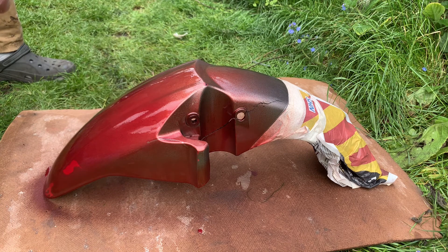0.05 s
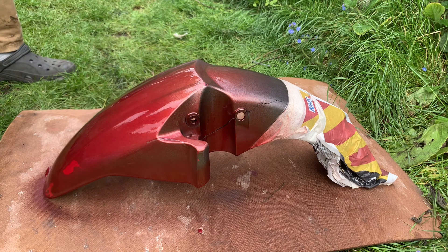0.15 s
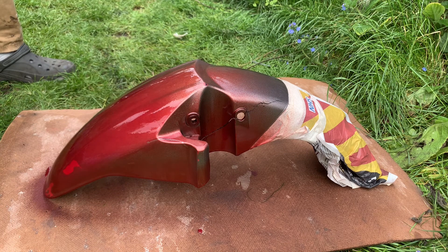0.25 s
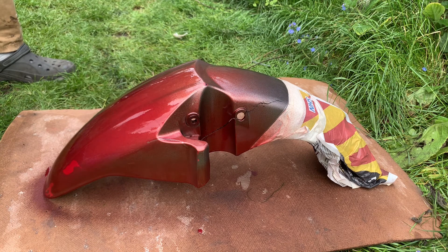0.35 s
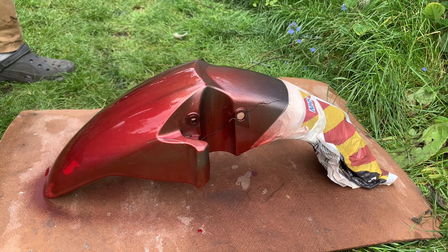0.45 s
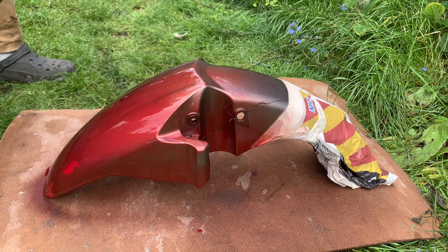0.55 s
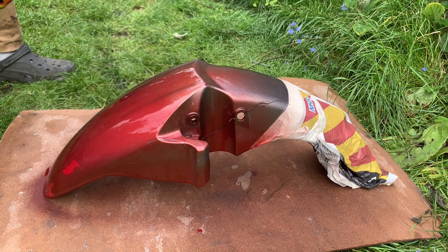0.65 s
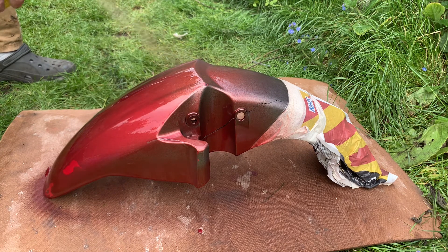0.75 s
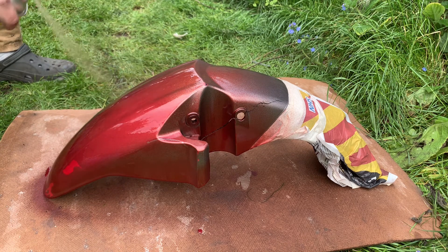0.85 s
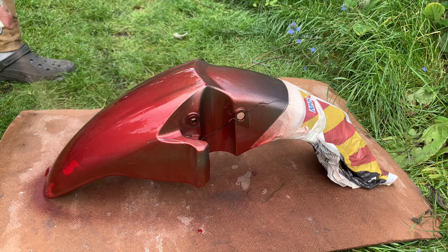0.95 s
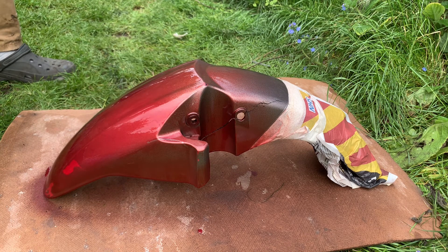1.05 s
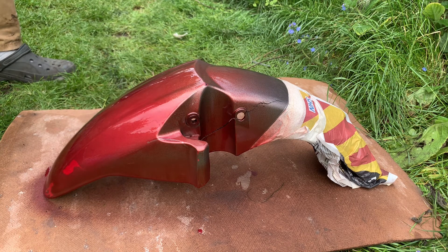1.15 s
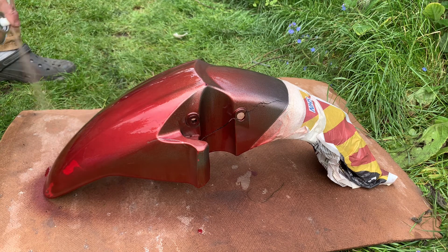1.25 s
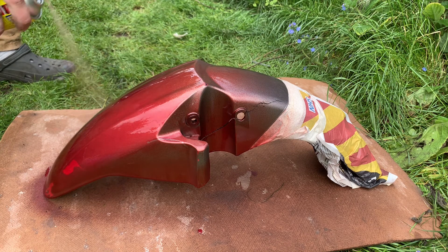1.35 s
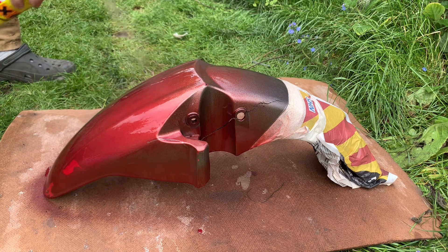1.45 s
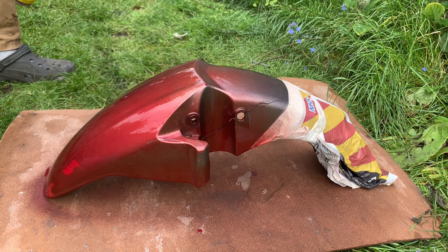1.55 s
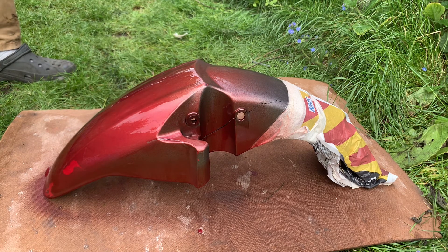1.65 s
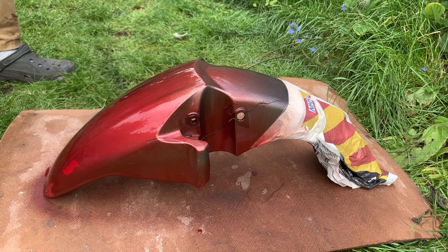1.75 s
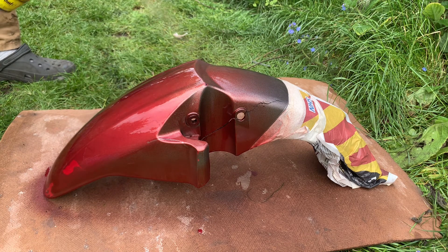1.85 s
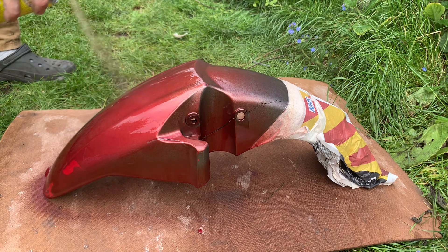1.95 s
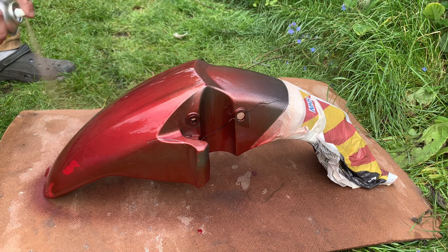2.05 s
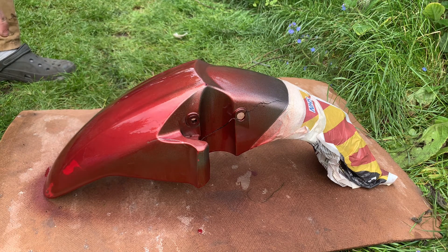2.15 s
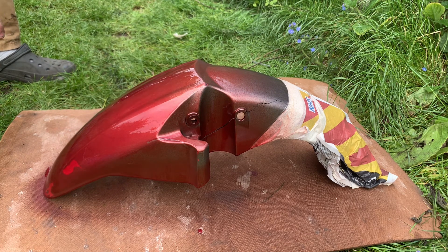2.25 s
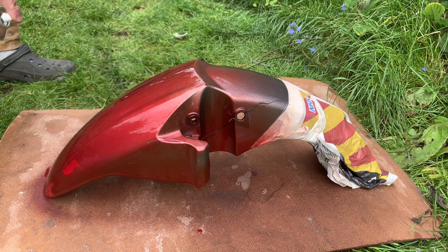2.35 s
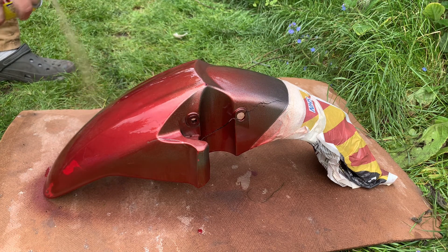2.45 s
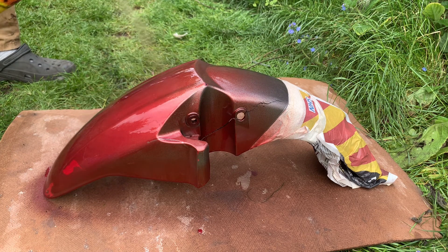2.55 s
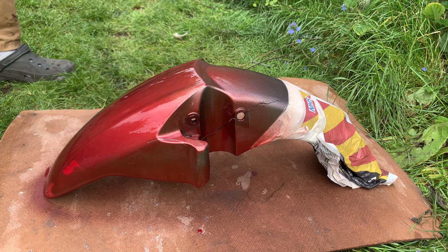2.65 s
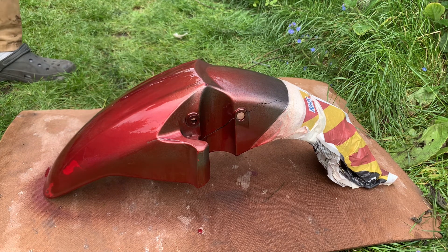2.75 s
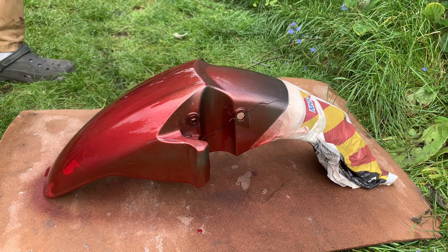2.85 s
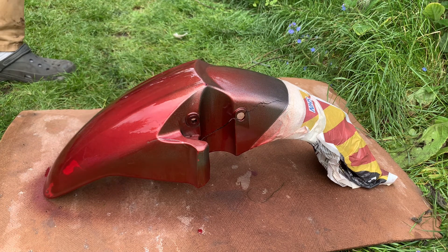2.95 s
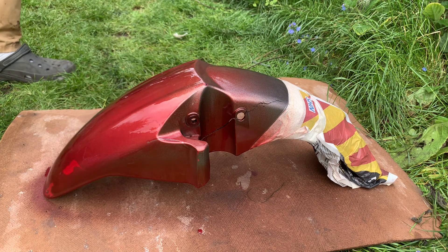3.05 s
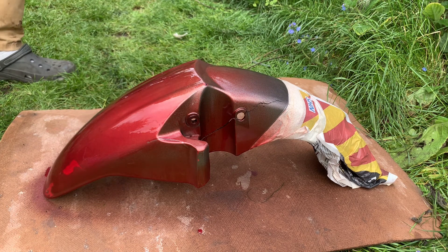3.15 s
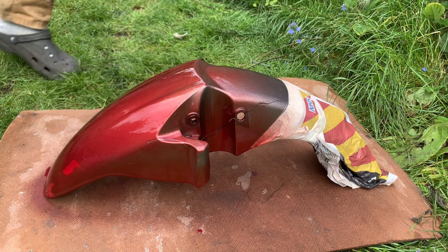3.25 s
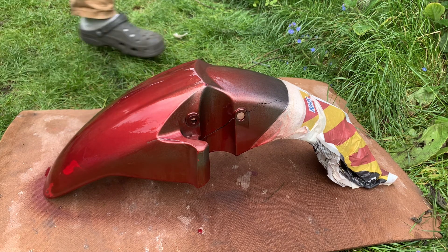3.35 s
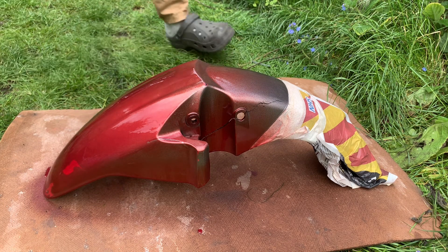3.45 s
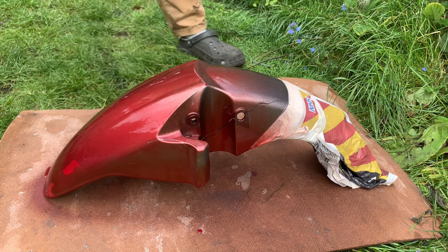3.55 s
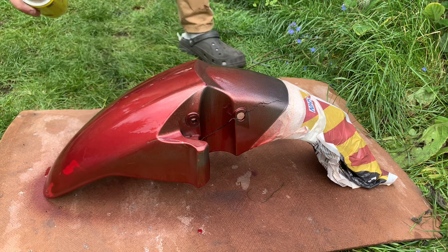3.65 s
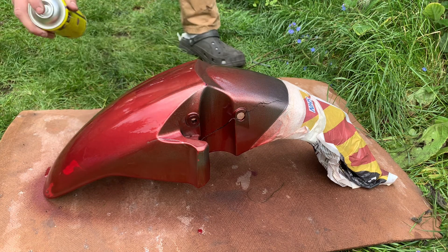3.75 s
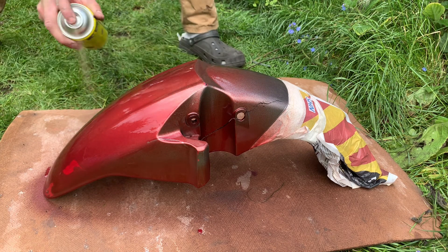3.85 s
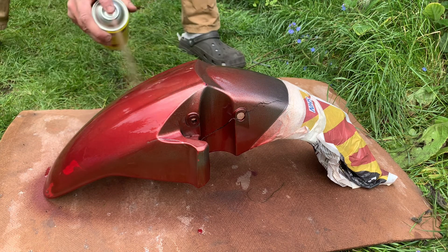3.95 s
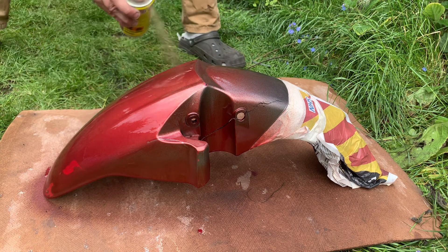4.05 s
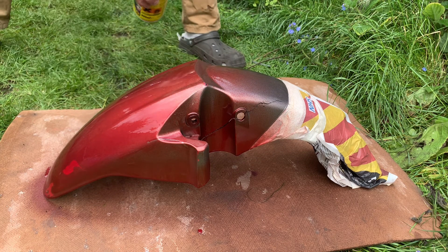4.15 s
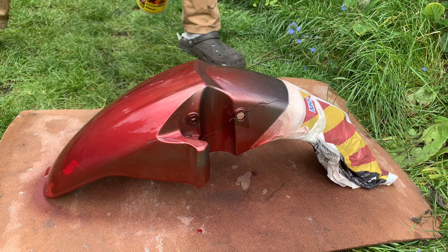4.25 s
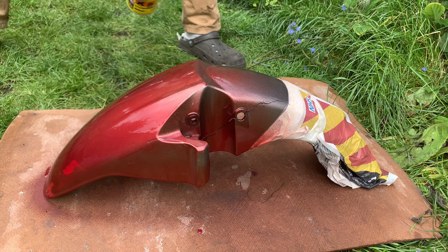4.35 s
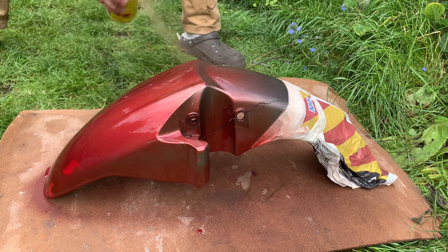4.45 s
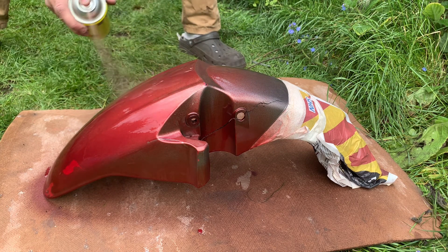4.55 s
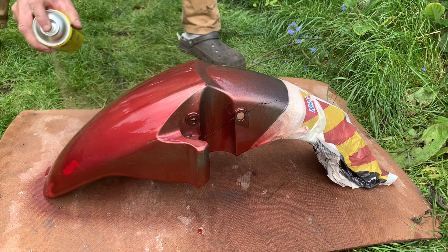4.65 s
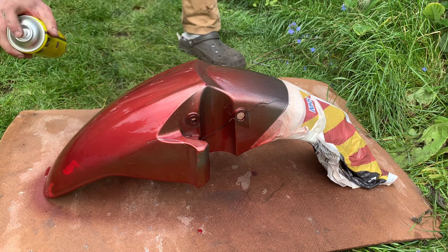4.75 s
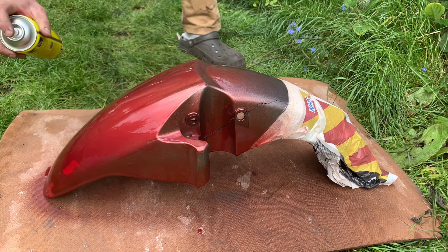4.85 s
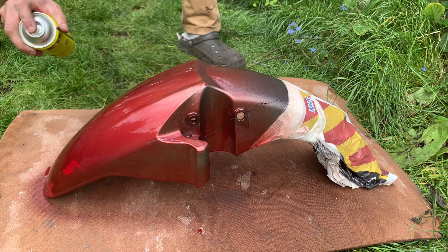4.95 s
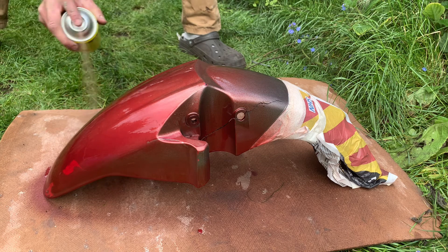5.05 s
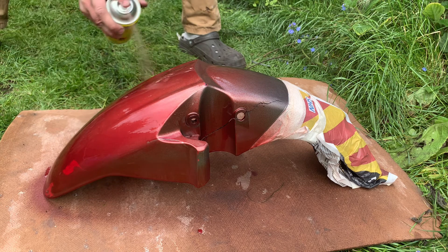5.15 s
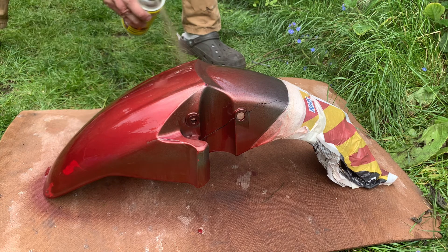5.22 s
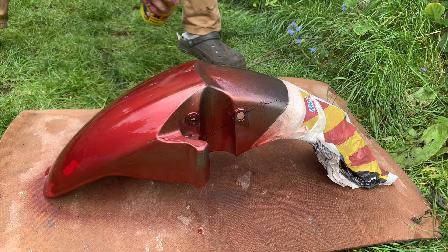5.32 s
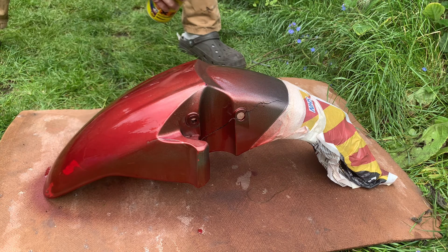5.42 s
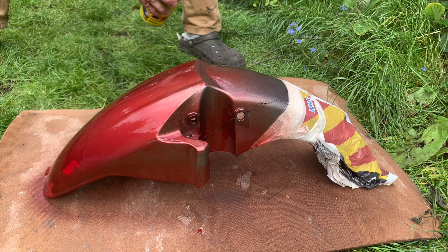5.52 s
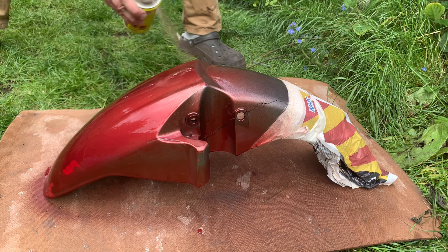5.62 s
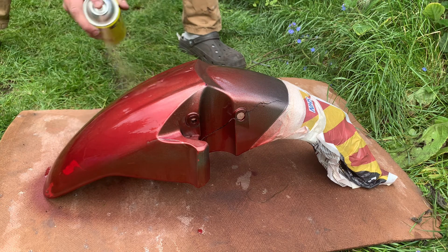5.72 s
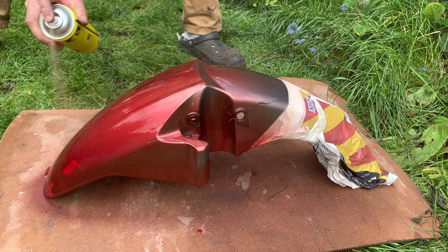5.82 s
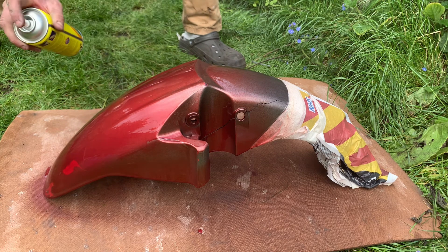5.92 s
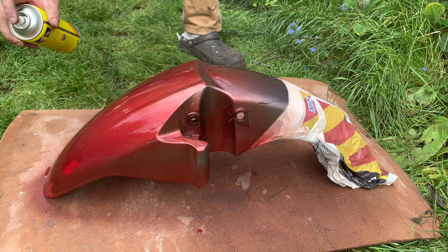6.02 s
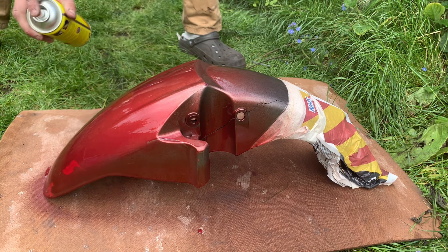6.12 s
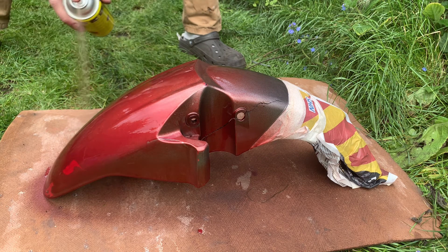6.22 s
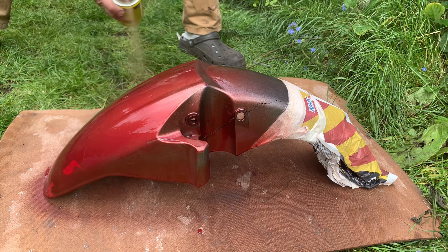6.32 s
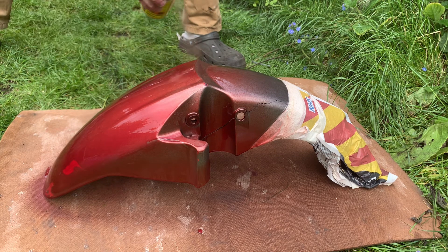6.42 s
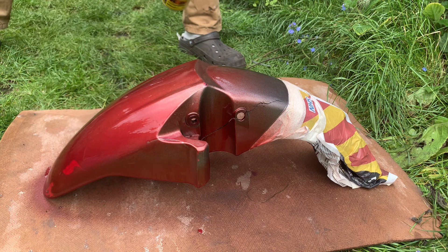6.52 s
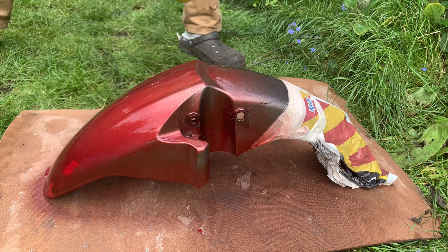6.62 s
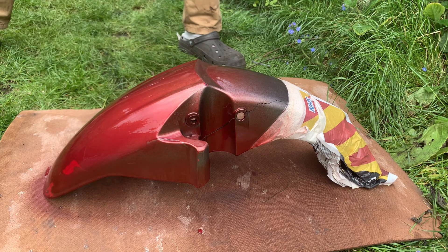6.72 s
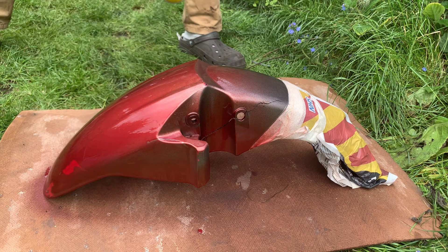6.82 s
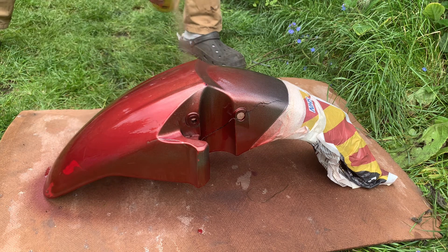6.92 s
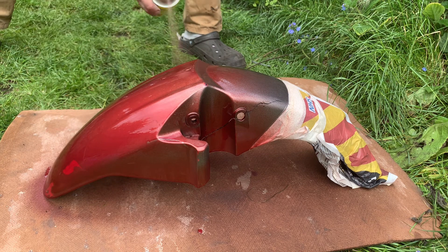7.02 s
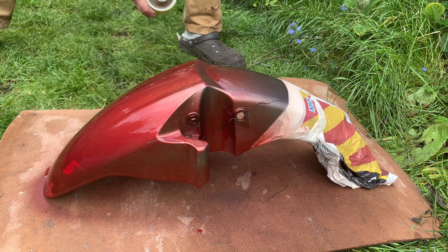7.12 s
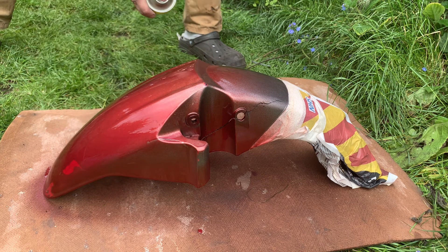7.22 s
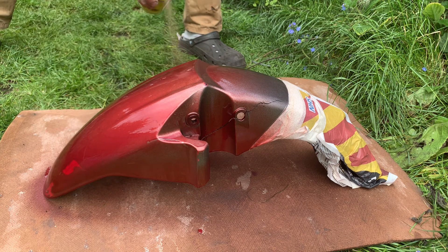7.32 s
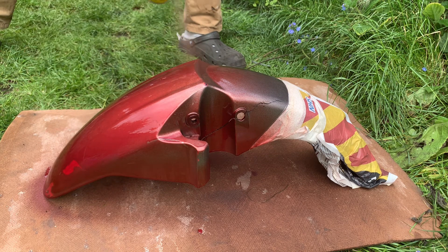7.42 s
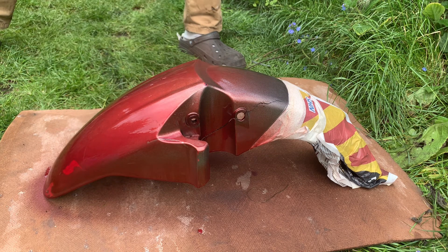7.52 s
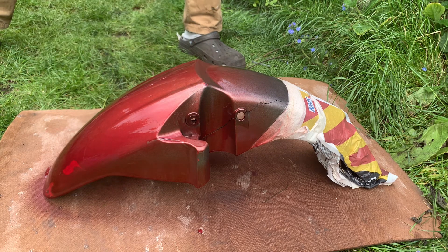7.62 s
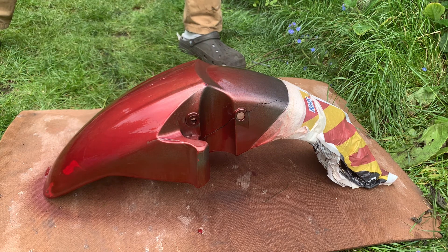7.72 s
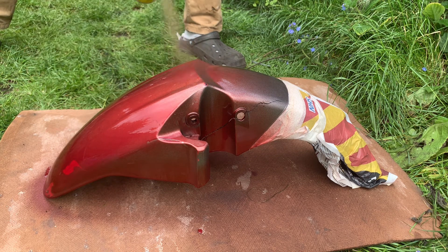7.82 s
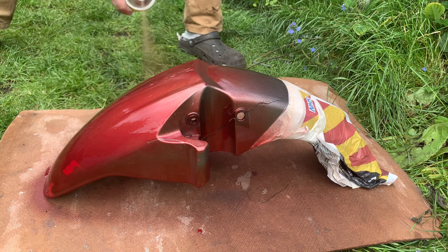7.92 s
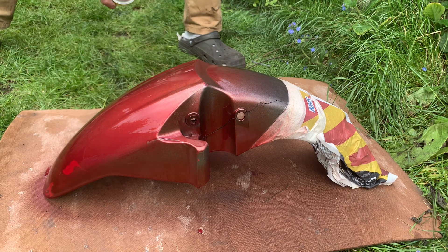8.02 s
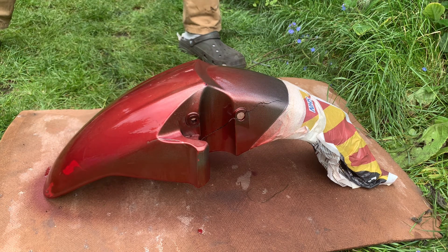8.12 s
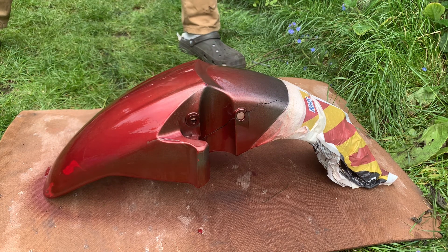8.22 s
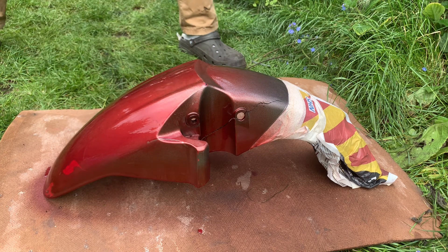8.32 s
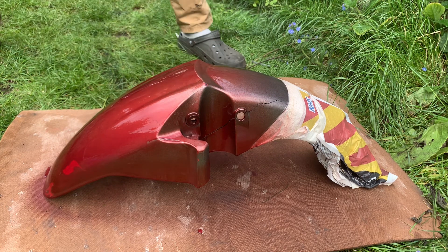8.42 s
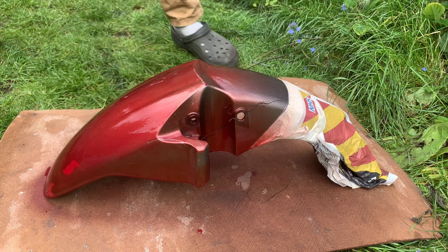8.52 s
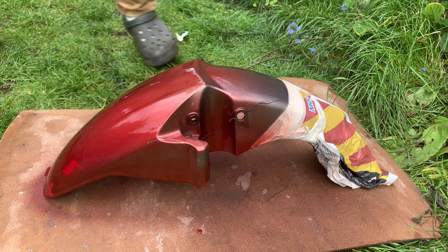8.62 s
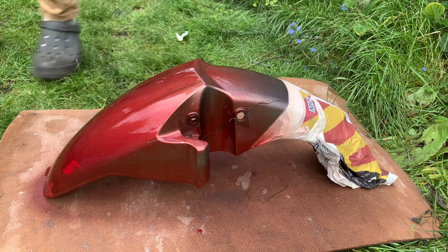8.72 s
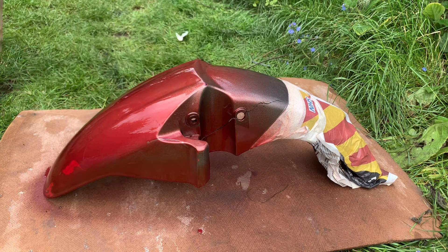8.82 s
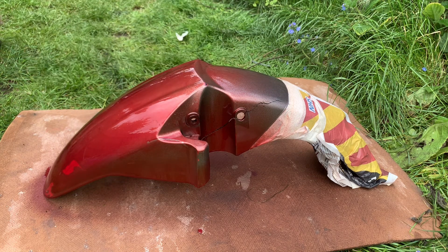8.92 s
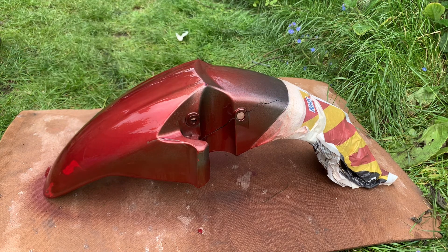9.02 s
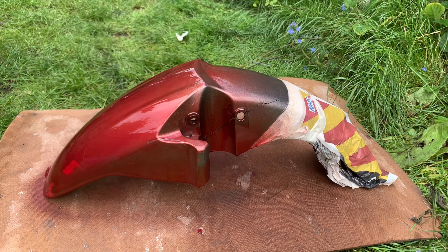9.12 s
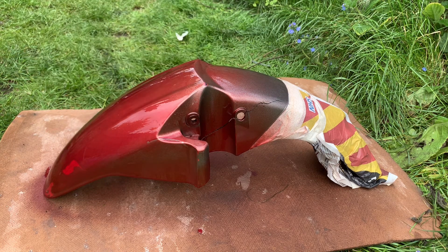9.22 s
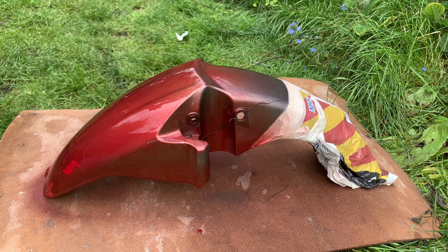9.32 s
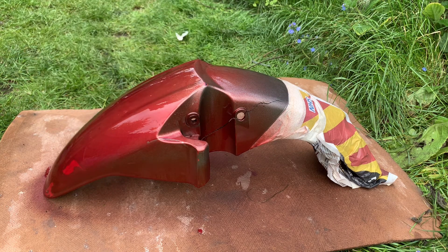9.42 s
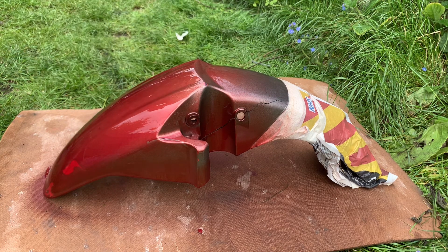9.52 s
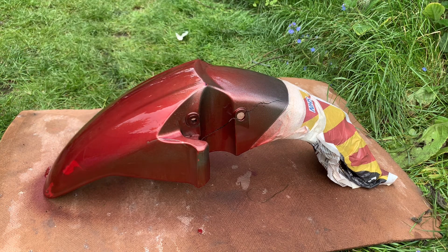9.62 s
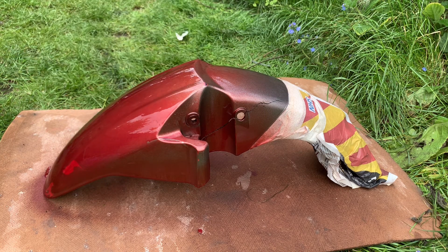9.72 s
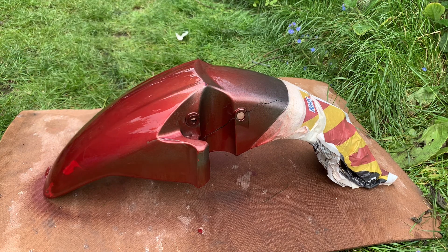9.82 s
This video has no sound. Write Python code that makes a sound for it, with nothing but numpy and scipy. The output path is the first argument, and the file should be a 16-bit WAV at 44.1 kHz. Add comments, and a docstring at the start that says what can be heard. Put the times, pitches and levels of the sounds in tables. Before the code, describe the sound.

A quiet garden with soft, far traffic rumble, slightly louder throughout, and barely audible bird notes in the first half second. Close to the microphone, an aerosol can gives bright, hissing squirts at about 0.6, 1.2, 1.8 and 2.4 s, each roughly 0.3 s, with a tiny leak before the sudden full flow and a quick shut-off. Very faint cap ticks fall near 1.0 and 1.2. From 2.9 to 3.7 the painter moves: grass swishes, a small hollow double knock at 3.2, a stronger brush at 3.7, while a distant engine drones low. Squirts resume at 3.8, 4.4, 5.0, 5.5 and 6.1, slightly softer, their airy colour sweeping; a thin, high whistle barely lingers after the first two. Shorter squirts follow at 6.8, 7.2 and 7.8. Deep dull thumps come around 7.5 and 8.0, then faint grassy steps and swelling traffic until 9.9.

```python
"""In a garden, an aerosol can sprays a fender: twelve short squirts swept to and fro across the part.
Each squirt is shaped noise, gated by a valve, combed by gliding reflections and shifted in stereo phase.
The painter's steps, noise swishes with clicks and damped knocks, follow the fourth squirt and the last.
Distant traffic (filtered noise) slowly swells, with one droning engine (sines) and a few dull thumps.
Faint gliding bird notes, cap ticks and a narrow-band whistle complete the scene."""
import sys
import numpy as np
from scipy import signal
from scipy.fft import rfft, irfft, next_fast_len
from scipy.io import wavfile
from scipy.ndimage import uniform_filter1d, map_coordinates

SR = 44100
rng = np.random.default_rng(int(sys.argv[2]) if len(sys.argv) > 2 else 0)


def master_out(mix):
    """Clip the mix to full scale and print it as 16-bit PCM to the path in sys.argv[1]."""
    frames = np.transpose(np.atleast_2d(mix))
    ceiling = np.clip(frames, -1, 1)
    pcm = np.round(ceiling * 32767).astype(np.int16)
    wavfile.write(sys.argv[1], SR, pcm)


N = 435266

# Distant traffic drawing nearer: t/s, relative level of its roar/dB
TRAFFIC_LEVEL = [(0, -61), (3.2, -54.5), (5.5, -52.5), (9.87, -48)]
# Spectra of traffic rumble, tyre roar and faint hiss: f/Hz, relative level/dB (per Hz)
RUMBLE_SPECTRUM = [(25, -29), (35, -8.5), (45, 2.5), (70, 1.5), (110, -6), (170, -7.5), (240, -8.5),
                   (330, -18), (600, -24), (1500, -61.5)]
ROAR_SPECTRUM = [(150, -25.5), (380, -3), (600, -2.5), (950, -1.5), (1400, -6.5), (2000, -14.5),
                 (3000, -24), (6000, -56.5)]
AIR_SPECTRUM = [(800, -9), (2200, -3), (4500, -0.5), (7000, -5.5), (10000, -14), (13000, -19.5),
                (15500, -23.5)]
# Left-right likeness of the surroundings: f/Hz, correlation [-1 to 1]
AMBIENT_LIKENESS = [(60, 0.95), (130, 0.97), (290, 0.82), (640, 0.21), (1400, 0.19), (2500, -.1),
                    (5500, -0.23), (7500, 0.93)]
RUMBLE_DB, RUMBLE_GROWTH = -48.5, 0.97  # level at the mean roar/dB; dB per dB of roar
AIR_START_DB, AIR_RISE_DB_PER_S = -78, 1.34

# A far engine pulls, then eases off:
# t/s, firing rate f/Hz, relative level of the firing tone/dB, level of its octave/dB
ENGINE_COURSE = [(0, 41.6, -67.5, -57), (1.3, 41.47, -57, -57.5), (2.4, 49, -49.5, -76),
                 (3, 49.45, -41.5, -59), (3.8, 46.3, -42, -66), (4.2, 44.12, -51, -64),
                 (6, 35.35, -71, -61), (7.5, 34.96, -44.5, -44.5), (8.9, 36.43, -51.5, -45),
                 (9.87, 34.82, -67, -54)]
# Higher engine overtones: multiple of the firing rate [1], level at the mean traffic roar/dB
ENGINE_OVERTONES = [(3, -62.5), (4, -60.5)]

# Very faint far bird notes: t/s, length/s, start f/Hz, end f/Hz, relative level/dB
BIRD_NOTES = [(.01, .08, 6770, 6100, -75), (.11, .08, 4620, 4560, -75), (.19, .06, 4050, 3950, -75),
              (.03, .47, 2900, 2830, -67), (.42, .2, 4250, 4500, -77)]
# Decay of the garden's scattered tail: f/Hz, t60/s
GARDEN_DECAY = [(500, .25), (4000, 0.23), (14000, 0.11)]

# Squirts: valve cracks t/s, valve shuts t/s, level/dB, start place and end place along the fender
# [0 left to 1 right], low hiss/dB, jet faces the microphone t/s, top treble gain then/dB,
# first leak to full flow/s
SQUIRTS = [(0.644, 0.968, -24.5, 0.49, 0.16, 0.5, .8, 2, .034),
           (1.211, 1.517, -24.5, 0.36, 0.6, 1, 1.35, 1, 0.03),
           (1.787, 2.1, -24.5, 0.67, 0.21, -0.5, 1.9, 2.5, .029),
           (2.361, 2.633, -25, 0.19, 0.74, 0, 2.47, 0, 0.03),
           (3.81, 4.113, -25, 0.1, 0.36, -1.5, 3.92, 3, 0.041),
           (4.363, 4.674, -26, 0.43, 0.016, -0.5, 4.56, 2, 0.031),
           (4.955, 5.29, -26.5, 0.034, 0.66, 2, 5.03, 3.5, 0.029),
           (5.53, 5.871, -27.5, 0.73, 0.012, 2, 5.68, 4.5, 0.032),
           (6.117, 6.464, -26.5, 0.03, 0.423, 0, 6.22, 5.5, 0.028),
           (6.83, 7.059, -26.5, 0.54, 0.65, 2.5, 6.93, 2.5, 0.031),
           (7.246, 7.5, -26.5, 0.59, 0.56, 2, 7.35, 3, 0.025),
           (7.758, 7.96, -26.5, 0.52, 0.51, 3, 7.85, 2.5, .027)]
# Jet spectra from the painter's two stances: f/Hz, relative level/dB (per Hz)
JET_SIDE_SPECTRUM = [(300, -38), (1500, -29), (2200, -30.5), (3000, -14), (4000, -18), (5400, -16),
                     (6300, -14.5), (7600, -9.5), (8600, -12), (10000, -4.5), (11500, -2), (12600, -1.5),
                     (13700, -7.5), (15600, -8.5)]
JET_BEHIND_SPECTRUM = [(300, -44), (1500, -21.5), (2000, -18), (2600, -17), (3300, -20), (4200, -17.5),
                       (5200, -13.5), (6000, -17), (6700, -10), (8000, -5), (9000, -9.5), (10000, -5),
                       (11000, -1), (13700, -1), (15600, -8.5)]
# Left-right likeness of the jet: f/Hz, correlation [-1 to 1]
JET_LIKENESS = [(1000, .85), (2200, .95), (2700, .93), (3300, .97), (4300, .82), (5600, .65), (6600, .88),
                (8000, .995)]
# Left-right phase of the stereo image below 7.5 kHz:
# f/Hz, early squirts/rad, later squirts with place low/rad, later squirts with place high/rad
STEREO_PHASE = [(0, 0, 0, 0), (1200, 1.9, 1.6, 1.4), (1900, 3, 2.9, 2.2), (2400, 3.14, 3.1, 2.85),
                (2900, 3.45, 3.3, 3.08), (3300, 4.6, 3.9, 3.14), (3750, 6.1, 5.4, 3.25),
                (4400, 6.28, 6.25, 4.1), (5300, 6.3, 6.3, 5.1), (6200, 3.5, 5.4, 3.5),
                (6800, 3.2, 4.1, 3.18), (7250, 3.14, 3.1, 3.1)]
# Left-right phase in the top treble, common to all three curves: f/Hz, phase/rad
STEREO_PHASE_TOP = [(7800, 2.35), (9150, .05), (9500, 0), (11650, -3.14), (13800, -6.25), (14250, -6.3),
                    (16000, -9.1)]
HIGH_PLACE = .55  # from this place on the high-place phase curve holds in full
CROSSING_S = 3  # the painter steps from the side to behind the fender
# from behind, the fender's hump hides the low hiss past SHADE_PLACE
SHADE_DB, SHADE_HZ, SHADE_PLACE, SHADE_WIDTH = 4.5, 5900, 0.25, 0.21
# from behind, a broad ridge: pitch at the left end, rise to the right end, half width, height
RIDGE_HZ, RIDGE_SPAN_HZ, RIDGE_WIDTH_HZ, RIDGE_DB = 7600, 1100, 650, 3.8
# the treble above BEAM_HZ is beamed forward and passes the microphone in about twice BEAM_S
BEAM_HZ, BEAM_S = 12700, 0.04
# reflections off the fender's curves and the board: shortest and longest detour at the left end,
# their growth to the right end, joint strength
ECHO_FIRST_MS, ECHO_LAST_MS, ECHO_STRETCH, ECHO_STRENGTH = .55, 3.6, .85, .64
ECHO_BEHIND = .6  # share of that strength from behind, where the jet points away from the board

# Small ticks of the finger on the nozzle cap: t/s, initial level/dB
CAP_TICKS = [(1.03, -60), (1.186, -63)]
# Dull thumps: t/s, peak level/dB before the stereo balance, f/Hz
THUMPS = [(2.212, -36, 84.5), (2.282, -35.5, 52.1), (3.244, -41, 63.4), (4.51, -36.5, 63.6),
          (7.438, -26.5, 57), (7.525, -30, 59.2), (7.966, -26, 61.5), (8.015, -22.5, 48.7),
          (8.128, -28, 54)]
THUMP_SWELL_S = 0.02

# Soft rustle while the painter moves: start t/s, end t/s, level/dB
SHUFFLES = [(2.87, 3.66, -69.5), (8.2, 9.9, -73.5)]
# Shoes brushing through grass: middle t/s, half length/s, level/dB, tilt/(dB per octave)
STEPS = [(2.949, 0.059, -61.5, 2.5), (3.125, 0.078, -54, -0.5), (3.279, 0.04, -58.5, 4),
         (3.521, 0.029, -62.5, 7), (3.727, 0.054, -44, 0), (8.258, 0.035, -63, 2), (8.567, 0.089, -62, 5),
         (8.725, .025, -66, 6), (8.819, 0.097, -59, 0.5), (9.121, 0.022, -58.5, 3.5),
         (9.728, 0.054, -62, 2)]
# Spectrum of the grass before the tilt: f/Hz, relative level/dB (per Hz)
GRASS_SPECTRUM = [(400, -4), (1100, 2), (2000, 2), (3000, 5.5), (4400, 3), (6000, -1.5), (9000, -4),
                  (13000, -7.5), (15500, -14)]
SHUFFLE_TILT = 2.8  # dB per octave
STRIDE_ROUNDNESS = 2.2  # exponent: how squarely a stride swells and stops
SNAPS_PER_S, SNAP_SPREAD_DB, SNAP_SHARE = 450, 4.5, .6  # blades snapping within the swish
GRASS_FLUTTER_DB = 1.1

# Knocks of a landing shoe: t/s, relative level/dB
KNOCKS = [(3.168, -25), (3.252, -30)]
# Ringing modes of the shoe: f/Hz, relative level/dB, t60/s
SHOE_MODES = [(141.4, -7, 0.045), (250, -6, 0.035), (405, -9, 0.025), (600, -5, 0.02), (1030, .5, 0.024),
              (1300, -4, 0.022), (2070, -14, .02)]
# A thin whistle lingering after two squirts: middle t/s, half length/s, level/dB
WHISTLES = [(4.24, 0.16, -74.5), (4.75, 0.042, -69)]
WHISTLE_HZ, WHISTLE_WIDTH_HZ = 10980, 130
TOP_HZ = 15850  # middle of the final cutoff


def amp(db):
    """Logarithmic level: decibels become an amplitude ratio."""
    return 10 ** (np.asarray(db) / 20)


def unit(x):
    """Power normalisation: scale to rms 1."""
    return x / np.sqrt(np.mean(x ** 2) + 1e-20)


def clock():
    """Uniform sampling: the time of each sample in seconds."""
    return np.arange(N) / SR


def along(points, hz):
    """Logarithmic pitch: interpolate (f, value) points on a log frequency axis."""
    f, v = np.transpose(points)
    return np.interp(np.log(hz + 1), np.log(f + 1), v)


def curves(rows):
    """Linear interpolation in time: one curve for each column after t."""
    s, *columns = np.transpose(rows)
    return [np.interp(clock(), s, column) for column in columns]


def wobble(rate, size=N):
    """Band-limited fluctuation: a smooth random curve with rate knots a second."""
    knots = rng.standard_normal(int(size * rate / SR) + 4)
    coarse = np.arange(0, size + 16, 16)
    smooth = map_coordinates(knots, [coarse * rate / SR])
    return np.interp(np.arange(size), coarse, smooth)


def filtered(x, response):
    """Linear filtering: multiply the spectrum by a response of frequency."""
    size = x.shape[-1]
    padded = next_fast_len(size + 4096)
    hz = np.fft.rfftfreq(padded, 1 / SR)
    return irfft(rfft(x, padded) * response(hz), padded)[..., :size]


def rush(spectrum, alike, size=N):
    """Partial coherence: mid and side noises give coloured stereo of the set likeness, rms 1."""
    def colour(hz):
        turn = np.arccos(np.clip(along(alike, hz), -1, 1)) / 2
        return amp(along(spectrum, hz)) * [np.cos(turn), np.sin(turn)]
    mid, side = filtered(rng.standard_normal((2, size)), colour)
    return unit(np.array([mid + side, mid - side]))


def add(track, s, sound):
    """Superposition: mix a sound into the track at time s."""
    part = track[..., round(s * SR):][..., :sound.shape[-1]]
    part += sound[..., :part.shape[-1]]


def patchy(x, depth_db, order=7, count=22):
    """Spectral fluctuation: smoothed random gains over frequency and time make the colour drift."""
    z = signal.stft(x, nperseg=512, noverlap=384)[2]
    field = rng.standard_normal(z.shape[1:])
    field = uniform_filter1d(field, order, 0)  # across frequency
    field = uniform_filter1d(field, count, 1)  # across time
    z = z * amp(depth_db * unit(field))
    return unit(signal.istft(z, nperseg=512, noverlap=384)[1][:, :x.shape[-1]])


def stereo_phases(hz):
    """Stereo phase: three left-right phase curves over frequency, sharing one top treble."""
    f, *columns = np.transpose(STEREO_PHASE)
    top_f, top = np.transpose(STEREO_PHASE_TOP)
    return [np.interp(hz, np.r_[f, top_f], np.r_[column, top]) for column in columns]


def widened(x):
    """Stereo phase: one fixed left-right phase curve widens all the surrounding sounds."""
    return filtered(x, lambda hz: np.exp(.5j * stereo_phases(hz)[0] * np.array([[1], [-1]])))


def garden(x):
    """Diffuse scattering: plants and fences add a short exponential tail, faster in the treble."""
    hz, t, z = signal.stft(rng.standard_normal(SR // 3), SR, nperseg=256)
    decay = amp(-60 * t / along(GARDEN_DECAY, hz)[:, None])
    tail = signal.istft(z * decay, SR, nperseg=256)[1]
    return signal.fftconvolve(x, tail[None] / np.linalg.norm(tail), axes=1)[:, :N]


def traffic(roar_db=-1):
    """Broadband noise: rumble, tyre roar and faint hiss swell together, each wavering on its own."""
    level, = curves(TRAFFIC_LEVEL)
    rumble_db = RUMBLE_DB + RUMBLE_GROWTH * (level - level.mean()) + 1.88 * wobble(9)
    rumble = amp(rumble_db) * rush(RUMBLE_SPECTRUM, AMBIENT_LIKENESS)
    roar = patchy(rush(ROAR_SPECTRUM, AMBIENT_LIKENESS), depth_db=2.15, order=2, count=24)
    roar = amp(roar_db + level + 0.33 * wobble(16)) * roar
    air_db = AIR_START_DB + AIR_RISE_DB_PER_S * clock() + 2.1 * wobble(5.7)
    air = amp(air_db) * rush(AIR_SPECTRUM, AMBIENT_LIKENESS)
    return rumble * amp([[-1], [1]]) + roar + air  # the rumble leans right


def engine(level_db=2, waver_db=1, overtone_growth=1.6):
    """Harmonic series: only the firing tone and its first overtones carry this far."""
    hz, tone_db, octave_db = curves(ENGINE_COURSE)
    near, = curves(TRAFFIC_LEVEL)
    phase = 2 * np.pi * np.cumsum(hz) / SR
    tone = amp(tone_db + level_db + waver_db * wobble(12)) * np.sin(phase)
    octave = amp(octave_db) * np.sin(2 * phase)
    overtones = sum(amp(db) * np.sin(round(k) * phase) for k, db in ENGINE_OVERTONES)
    return tone + octave + amp(overtone_growth * (near - near.mean())) * overtones


def bird(level_db=-1, blur=1.0):
    """Frequency glides: short notes, blurred in phase by distance and leaves."""
    out = np.zeros(N)
    for s, length, start_hz, end_hz, db in BIRD_NOTES:
        size = round(length * SR)
        phase = 2 * np.pi * np.cumsum(np.linspace(start_hz, end_hz, size)) / SR
        phase = phase + blur * wobble(start_hz / 12, size=size)
        add(out, s, amp(db + level_db) * np.hanning(size) * np.sin(phase))
    return garden(out[None])


def delayed(x, ms):
    """Propagation delay: one channel, later by a time that may change."""
    return map_coordinates(x, [np.arange(len(x)) - ms * SR / 1000], order=3)


def reflected(jet, place, strength, count=12):
    """Comb filtering: small reflections ripple the hiss and glide as the hand sweeps and trembles."""
    stretch = 1 + ECHO_STRETCH * (place + .012 * wobble(14, size=len(place)))
    spacing = (np.arange(count) + rng.random(count)) / count
    detours_ms = ECHO_FIRST_MS * (ECHO_LAST_MS / ECHO_FIRST_MS) ** spacing
    gains = rng.choice([-1, 1], count) / np.sqrt(detours_ms)
    gains = gains * strength * ECHO_STRENGTH / np.linalg.norm(gains)
    sides = []
    for side in jet:
        echoes = sum(gain * delayed(side, ms * stretch) for ms, gain in zip(detours_ms, gains))
        sides.append(side + echoes)
    return unit(np.array(sides))


def swept(jet, place, facing_s, low_db, beam_db, behind):
    """Moving colour: lows dim, a ridge glides, treble flares, the stereo phase shifts."""
    hz, t, z = signal.stft(jet, SR, nperseg=512, noverlap=384)
    hz = hz[:, None]
    place = np.interp(t, np.arange(len(place)) / SR, place)
    shade_db = -behind * SHADE_DB / 2 * np.tanh((place - SHADE_PLACE) / SHADE_WIDTH)
    low = (low_db + shade_db) / (1 + (hz / SHADE_HZ) ** 8)
    ridge_hz = RIDGE_HZ + RIDGE_SPAN_HZ * place
    ridge = behind * RIDGE_DB * np.exp(-((hz - ridge_hz) / RIDGE_WIDTH_HZ) ** 2)
    treble = 1 - 1 / (1 + (hz / BEAM_HZ) ** 20)
    beam = beam_db * np.exp(-((t - facing_s) / BEAM_S) ** 2) * treble
    phase, low_place, high_place = stereo_phases(hz)
    if behind:
        phase = low_place + (high_place - low_place) * np.clip(place / HIGH_PLACE, 0, 1) ** 2
    z = z * amp(low + ridge + beam) * np.exp(.5j * np.array([phase, -phase]))
    return signal.istft(z, SR, nperseg=512, noverlap=384)[1][:, :jet.shape[-1]]


def spray(leak_db=-12.5, leak_s=0.0099, open_s=0.023, shut_s=0.034, sputter_db=-0.05, flow_db=1.3):
    """Jet turbulence: gas leaks as the valve cracks, then the full jet hisses as the hand sweeps."""
    out, size = np.zeros((2, N)), SR * 2 // 5
    for crack, shut, db, start, end, low_db, facing, beam_db, press_s in SQUIRTS:
        behind = crack > CROSSING_S
        t = crack + np.arange(size) / SR
        place = np.interp(t, [crack, shut], [start, end])
        jet = rush(JET_BEHIND_SPECTRUM if behind else JET_SIDE_SPECTRUM, JET_LIKENESS, size=size)
        jet = patchy(jet, depth_db=1.7 if behind else 1.2)
        jet = reflected(jet, place, ECHO_BEHIND if behind else 1)
        jet = swept(jet, place, facing - crack, low_db, beam_db, behind)
        leak = amp(leak_db) * np.clip((t - crack) / leak_s, 0, 1)
        opening = np.clip(1 + (t - crack - press_s) / open_s, 0, 1)
        closing = np.sin(np.pi / 2 * np.clip((shut - t) / shut_s, 0, 1)) ** 2
        # paint and propellant pass the nozzle unevenly
        sputter = amp(sputter_db * wobble(350, size=size) + flow_db * wobble(34.2, size=size))
        add(out, crack, amp(db) * jet * np.maximum(leak, opening) * closing * sputter)
    return out


def ticks():
    """Impulsive excitation: the cap ticks under the finger as fast-decaying noise."""
    out, t = np.zeros((2, N)), np.arange(SR // 10) / SR
    for s, db in CAP_TICKS:
        noise = rush(JET_SIDE_SPECTRUM, AMBIENT_LIKENESS, size=len(t))
        add(out, s, amp(db - 60 * t / 0.056) * noise)
    return out


def thumps():
    """Heavily damped oscillation: soft low pushes swell and die within a few cycles."""
    out, t = np.zeros(N), np.arange(SR // 3) / SR
    u = t / THUMP_SWELL_S
    swell = (u * np.exp(1 - u)) ** 2
    for s, db, hz in THUMPS:
        add(out, s, amp(db) * swell * np.sin(2 * np.pi * hz * t))
    return out


def crackle(size):
    """Random point process: blades snap as sparse clicks of uneven strength, rms 1."""
    snaps = rng.random(size) < SNAPS_PER_S / SR
    strength = amp(SNAP_SPREAD_DB * rng.standard_normal(size))
    return unit(snaps * rng.choice([-1, 1], size) * strength)


def grass(tilt, size):
    """Friction noise: swishing blades with snaps among them, rms 1; tilt in dB per octave."""
    spectrum = [(hz, level + tilt * np.log2(hz)) for hz, level in GRASS_SPECTRUM]
    swish = rush(spectrum, [(1000, 0.053), (8000, 0.64)], size=size)
    snaps = unit(filtered(crackle(size), lambda hz: amp(along(spectrum, hz))))
    flutter = amp(GRASS_FLUTTER_DB * wobble(70, size=size))
    return unit((swish + SNAP_SHARE * snaps) * flutter)


def steps(fade_s=0.073):
    """Amplitude-modulated friction: grass brushes each stride and rustles while the painter moves."""
    out, size = np.zeros((2, N)), SR // 2
    t = (np.arange(size) - size / 2) / SR
    for s, half, db, tilt in STEPS:
        stride = np.exp(-np.abs(t / half) ** STRIDE_ROUNDNESS)
        add(out, s + t[0], amp(db) * stride * grass(tilt, size))
    moving = np.zeros(N)
    for start, end, db in SHUFFLES:
        to_edge_s = np.minimum(clock() - start, end - clock())
        moving += amp(db) * np.clip(to_edge_s / fade_s, 0, 1)
    return out + moving * grass(SHUFFLE_TILT, N)


def knocks(level_db=-11.5, scuff_db=-2, push_db=5, push_s=.0003, crack_db=-7, crack_t60_s=.018):
    """Modal impact: heel and sole land with a blunt push, a dry crack, a scuff and a hollow ring."""
    out, t = np.zeros(N), np.arange(SR // 5) / SR
    push = amp(push_db) * t / push_s * np.exp(1 - t / push_s)
    onset = 1 - np.exp(-t / 0.0007)
    for s, db in KNOCKS:
        ring = np.zeros(len(t))
        for hz, level, t60 in SHOE_MODES:
            decay = amp(level + rng.normal(0, 1.8) - 60 * t / t60)
            ring += decay * np.sin(2 * np.pi * (hz * t + rng.random()))
        scuff = filtered(rng.standard_normal(len(t)), lambda hz: 1 / (1 + (hz / 1500) ** 2))
        scuff = amp(scuff_db - 60 * t / 0.04) * unit(scuff)
        crack = filtered(rng.standard_normal(len(t)), lambda hz: 1 / (1 + (hz / 4000) ** 4))
        crack = amp(crack_db - 60 * t / crack_t60_s) * unit(crack)
        add(out, s, amp(db + level_db) * (push + crack + (ring + scuff) * onset))
    return out


def whistle():
    """Narrow-band noise: a thin, breathy whistle, likely gas seeping from the nozzle."""
    def band(hz):
        return np.exp(-((hz - WHISTLE_HZ) / WHISTLE_WIDTH_HZ) ** 2)
    tone = unit(filtered(rng.standard_normal(N), band))
    return tone * sum(amp(db) * np.exp(-((clock() - s) / half) ** 2) for s, half, db in WHISTLES)


def scene():
    """Superposition of sources: the can and footsteps close by, the traffic far behind."""
    can = spray()
    bass = (engine() + thumps()) * amp([[-.9], [.9]])  # leans right
    around = traffic() + bass + bird() + ticks() + steps() + knocks() + whistle()
    return can + amp(-15.5) * garden(can) + widened(around)


def record(dry):
    """Band limiting: a 200 Hz wide ramp about the cutoff removes everything above it."""
    return filtered(dry, lambda hz: np.clip((TOP_HZ - hz) / 200 + .5, 0, 1))


dry = scene()
out = record(dry)
master_out(out)
```